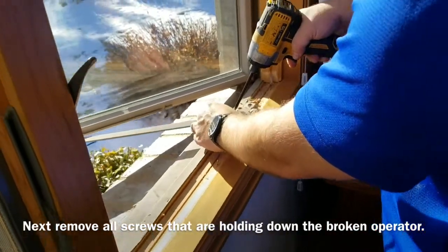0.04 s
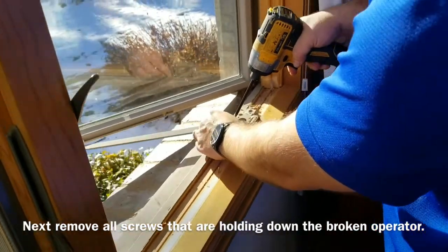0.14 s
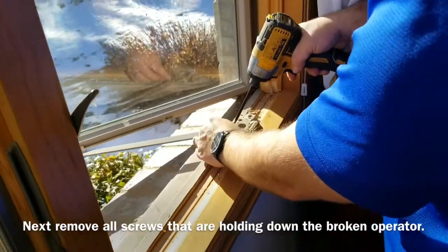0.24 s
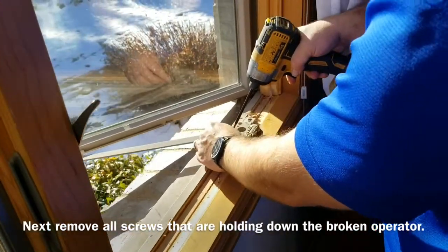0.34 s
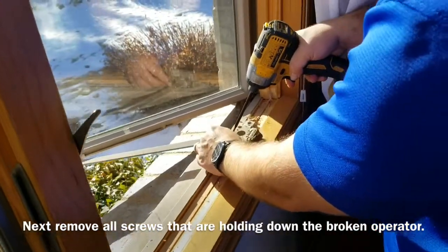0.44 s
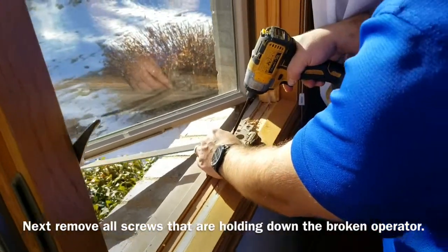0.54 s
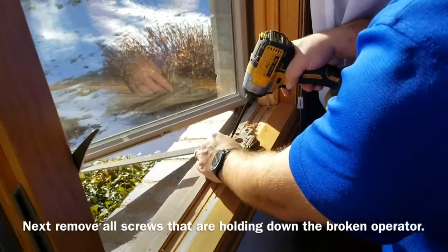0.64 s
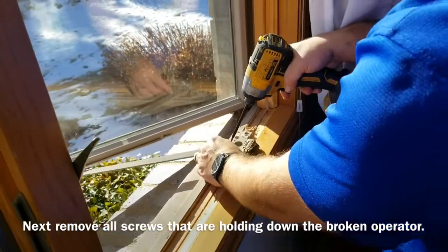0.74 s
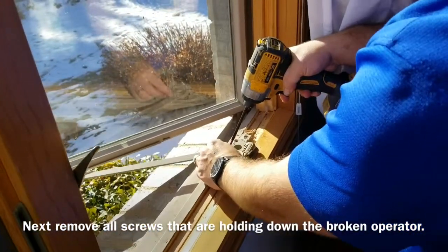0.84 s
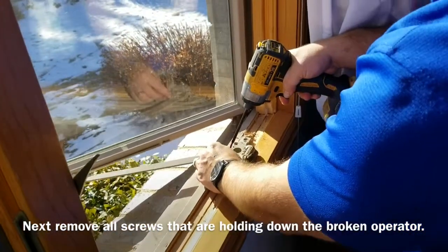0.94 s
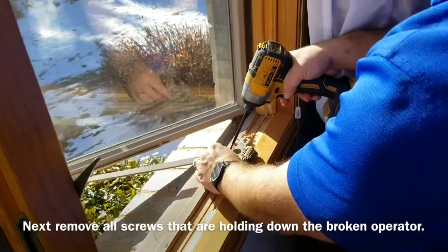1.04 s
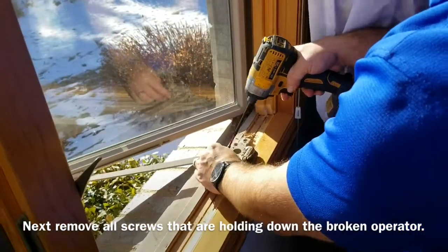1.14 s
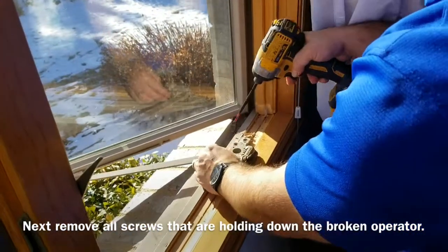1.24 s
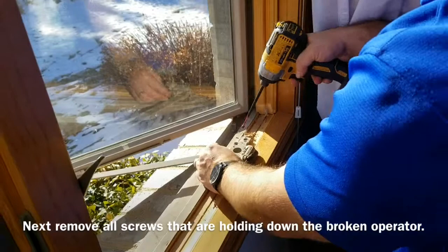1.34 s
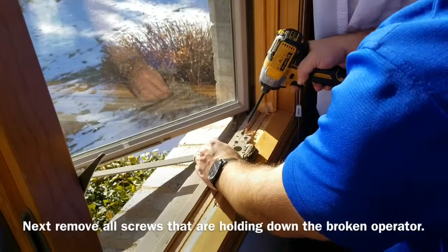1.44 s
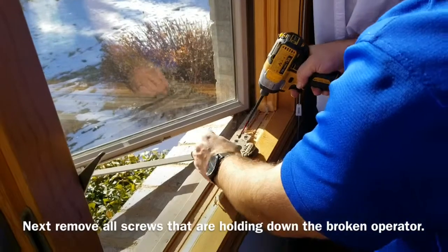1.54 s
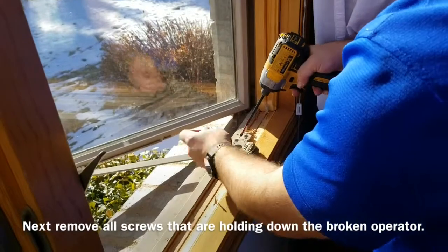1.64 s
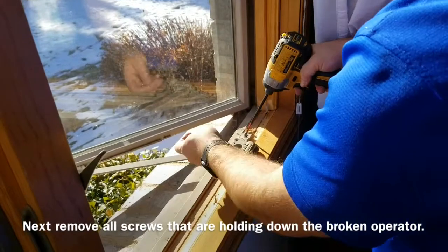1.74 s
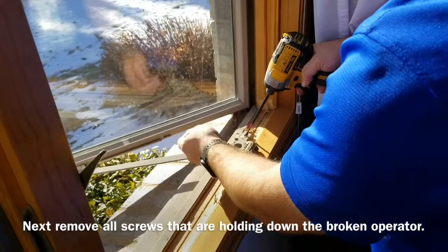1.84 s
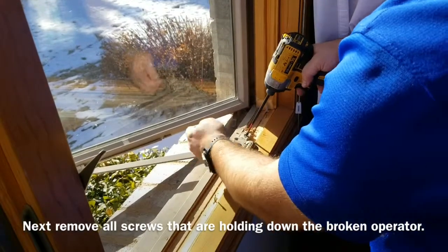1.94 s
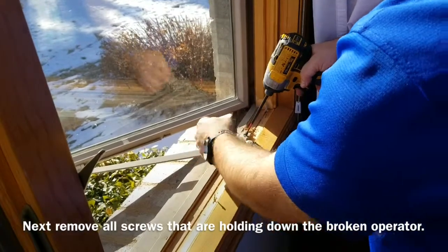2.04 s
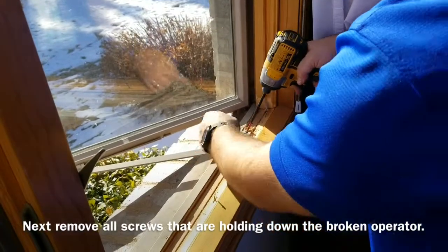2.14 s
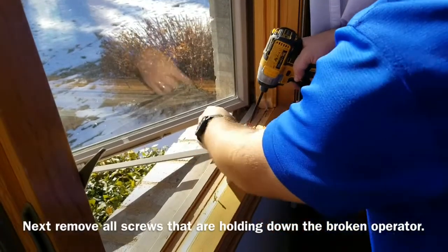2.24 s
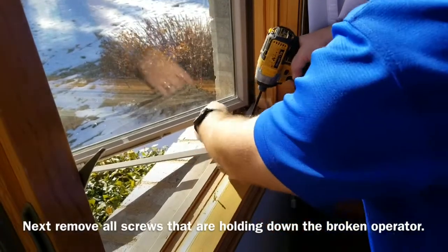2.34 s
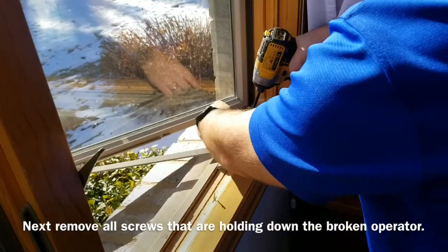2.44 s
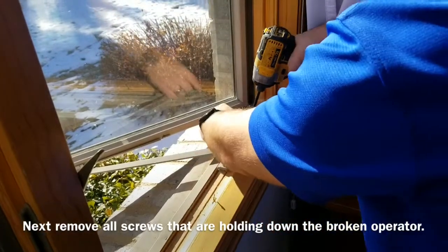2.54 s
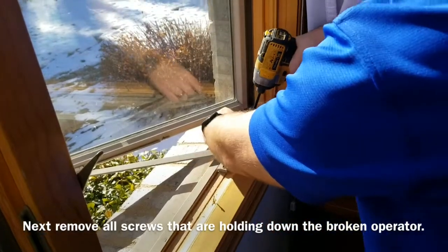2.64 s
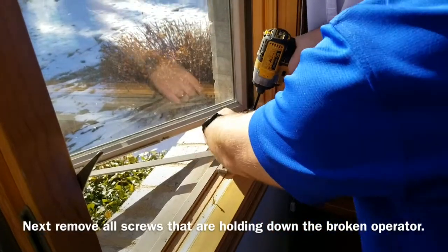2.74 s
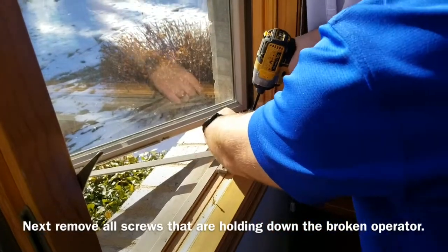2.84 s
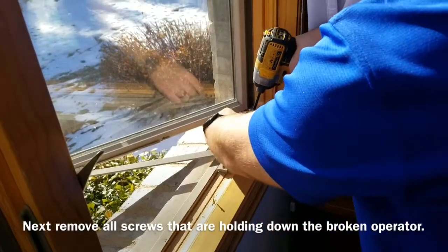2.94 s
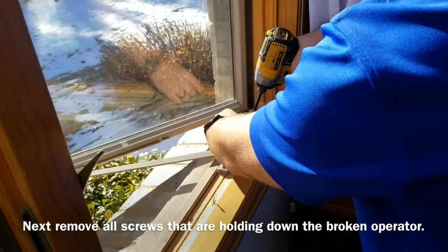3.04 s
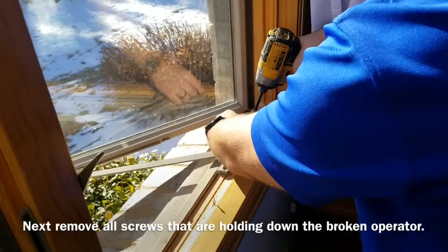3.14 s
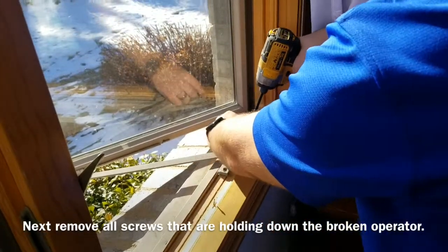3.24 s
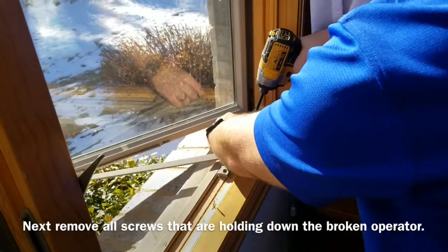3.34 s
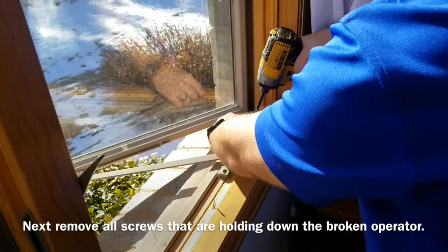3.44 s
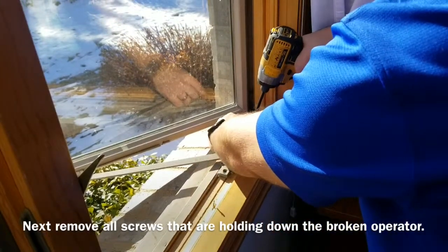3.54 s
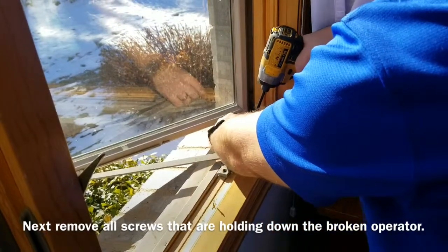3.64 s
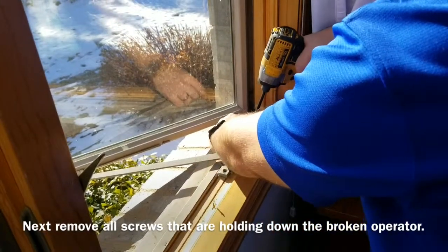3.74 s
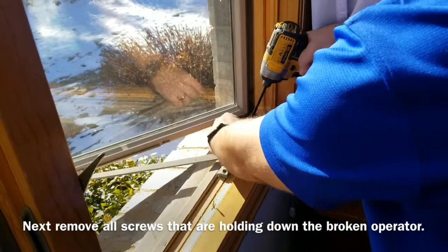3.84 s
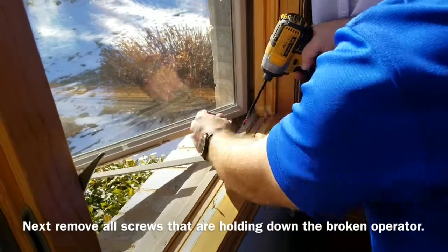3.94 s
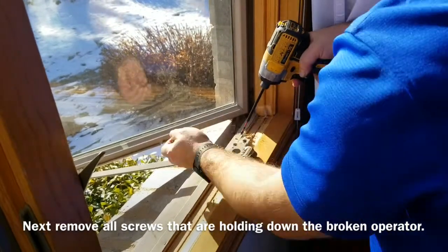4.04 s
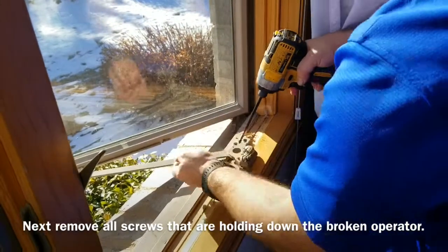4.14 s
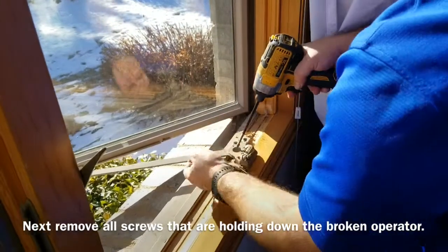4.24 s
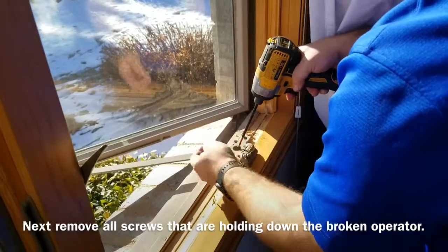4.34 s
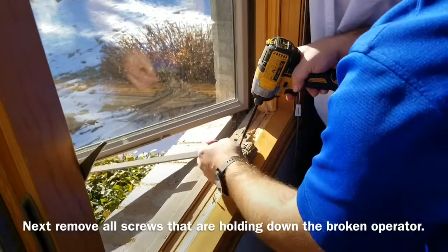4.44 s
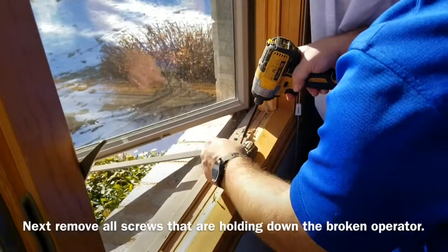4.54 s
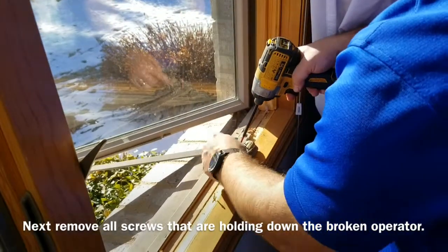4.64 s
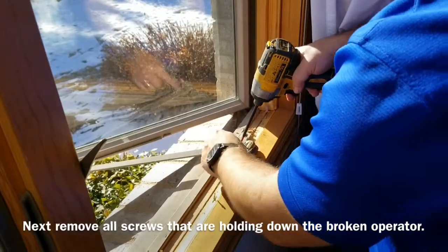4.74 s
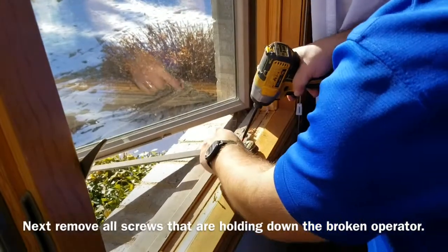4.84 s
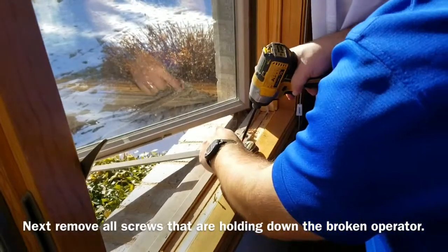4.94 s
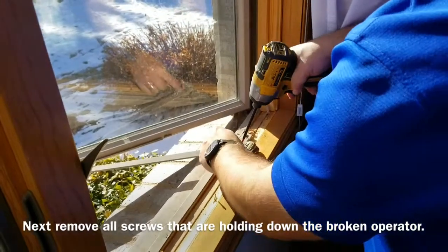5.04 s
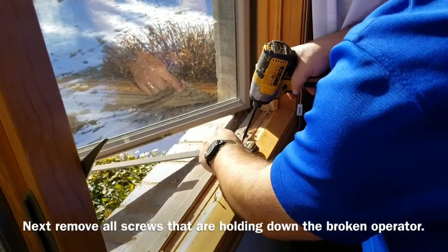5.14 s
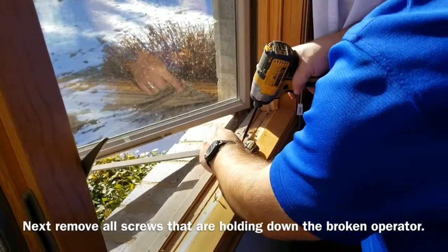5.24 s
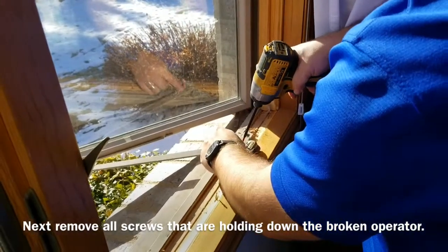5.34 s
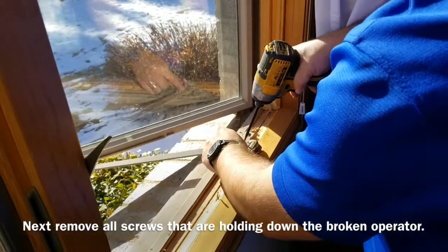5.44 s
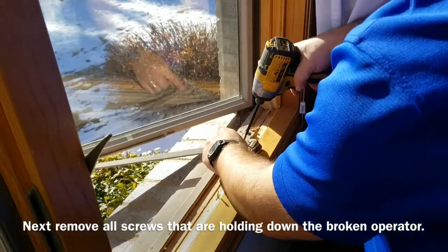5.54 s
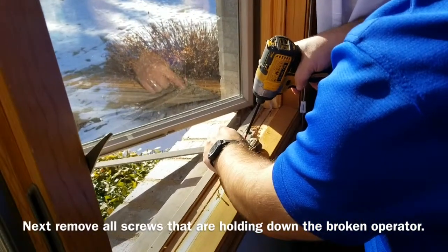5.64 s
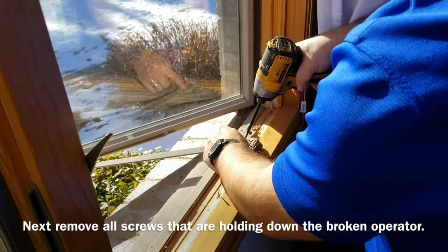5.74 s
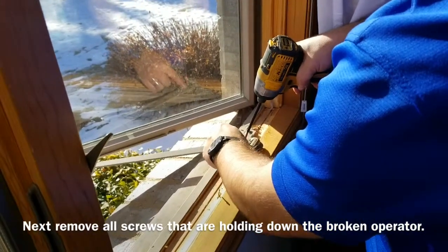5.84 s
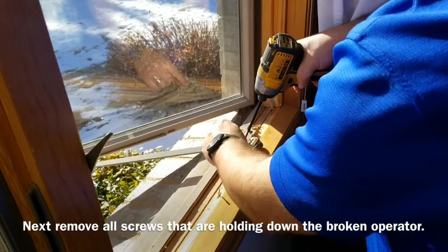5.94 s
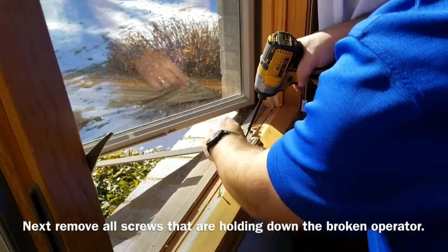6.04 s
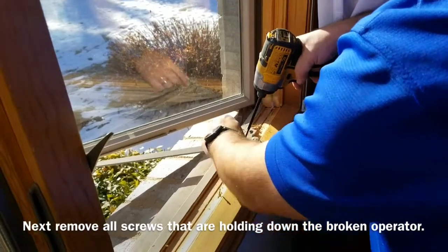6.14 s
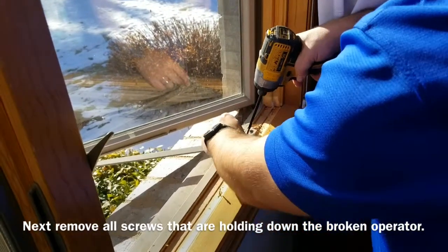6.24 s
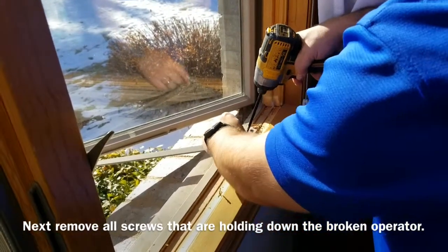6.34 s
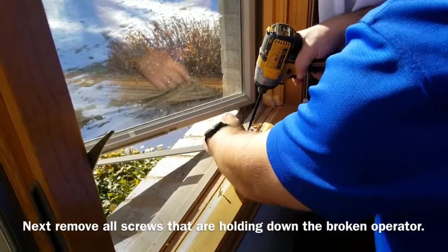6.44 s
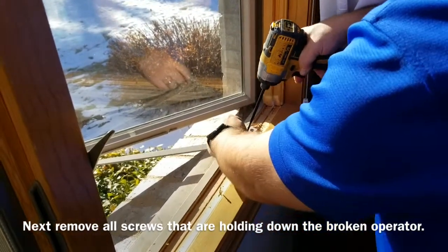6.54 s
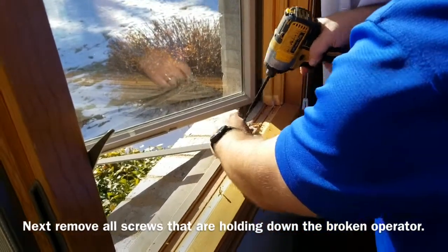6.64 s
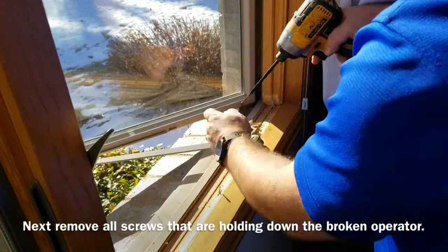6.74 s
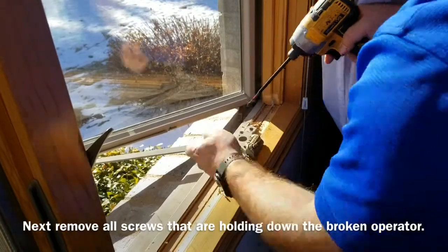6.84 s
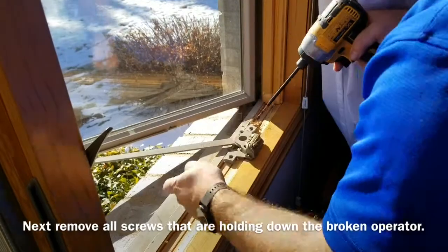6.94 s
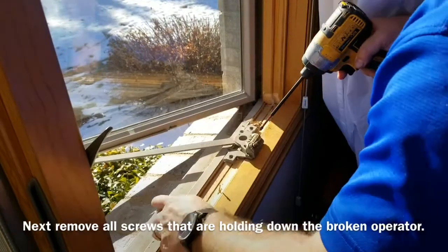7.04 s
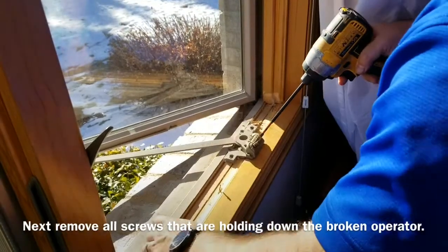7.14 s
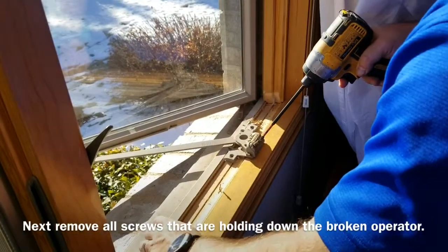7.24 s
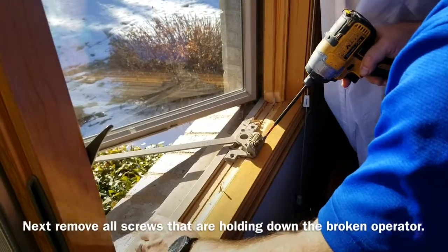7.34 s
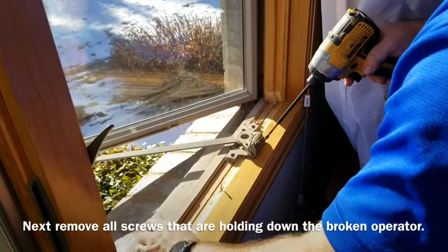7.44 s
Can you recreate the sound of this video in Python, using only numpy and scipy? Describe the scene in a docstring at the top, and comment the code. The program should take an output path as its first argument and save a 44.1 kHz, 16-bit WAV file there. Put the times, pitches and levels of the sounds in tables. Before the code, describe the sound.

A handheld electric driver removes screws from a metal fitting on a wooden sill. Three rough, whining bursts pulse with the turning bit and speed up as screws loosen, each stopping abruptly. Between them come handling ticks, brief squeals, a hard clack, woody thuds and a thin screw ping. The pickup is near, slightly left-leaning, with a short indoor tail, low rumble and faint hiss.

```python
"""In a small room, a cordless driver backs three screws out of a metal fitting on a wooden window sill.
The whine is a stack of motor harmonics; the rasp is noise that partly repeats with every motor turn.
The rasp dips with each turn of the bit, and the motor speeds up as a screw comes free.
Around and between the runs, noise bursts and ringing tones make clicks, scrapes, squeals, knocks on
the sill and loose screws put down. Filtered noise makes the low room sound; a soft hum joins late."""
import sys
import numpy as np
from scipy import signal
from scipy.fft import rfft, irfft
from scipy.io import wavfile

SR = 44100
rng = np.random.default_rng(int(sys.argv[2]) if len(sys.argv) > 2 else 0)


def wav_out(sig):
    """Save sig, one row per channel (or a flat mono array), as 16-bit PCM at SR to the path in sys.argv[1]."""
    wavfile.write(sys.argv[1], SR, np.round(np.clip(np.atleast_2d(sig).T, -1, 1) * 32767).astype(np.int16))


N = 329868
TIME = np.arange(N) / SR   # seconds

# Average motor speed in each run, before small wobbles: (time [s], speed [turns per s])
SPEED_RUN_1 = [(0, 262), (.17, 275), (.41, 305), (.44, 293), (.52, 311), (.6, 341), (.7, 338), (.87, 343),
               (1.05, 361)]
SPEED_RUN_2 = [(2.44, 200.3), (2.57, 302.7), (2.659, 318.2), (2.71, 318), (2.83, 337), (2.92, 343),
               (3.08, 367.6), (3.1, 420.8), (3.14, 439), (3.2, 514), (3.3, 538), (3.61, 557.6), (3.71, 538),
               (3.85, 301)]
SPEED_RUN_3 = [(5.0, 70.15), (5.21, 168.5), (5.28, 190.8), (5.41, 199), (5.455, 287.4), (5.54, 307),
               (5.57, 336), (5.62, 355.6), (5.72, 371), (5.79, 366.7), (5.86, 384.7), (6.04, 393.6),
               (6.12, 456), (6.3, 496), (6.34, 440.8), (6.502, 348)]
# One row per screw: (trigger pulled [s], full power [s], screw comes loose [s], trigger let go [s],
# a moment when the bit slips [s], level at the pull [dB], gear level [dB], housing level [dB],
# change of the gears once loose [dB])
SCREW_RUNS = [(0, 0.007, .6, 1.052, 0.3, 3, -27.5, -37.5, -1.5),
              (2.454, 2.527, 3.25, 3.71, 3.1, -18, -26.5, -36, -2),
              (5.004, 5.53, 5.95, 6.435, 5.835, -23.5, -26, -36.5, -2.5)]
# Whine of each run, lifted by a resonance that shifts as the bit bears on the screw:
# (time [s], level [dB], resonance [Hz], lift [dB])
WHINE_RUN_1 = [(.08, -52, 1060, 7.5), (.22, -51.5, 2170, 8), (.5, -52.5, 2100, 1.5), (.95, -55, 2500, -1),
               (1.04, -59.5, 2630, 19)]
WHINE_RUN_2 = [(2.45, -57.5, 1740, 0.5), (2.56, -49.5, 1720, 3.5), (2.68, -46, 1260, 6.5),
               (2.84, -45, 1690, 8), (3.13, -47, 1730, 9), (3.299, -54, 2182, 7)]
WHINE_RUN_3 = [(5.22, -58.5, 390, 2.1), (5.3, -47, 390, 9), (5.41, -55.5, 400.1, 5.37),
               (5.48, -50, 1450, 3.1), (5.8, -45.5, 1552, 6.4), (6.1, -56.5, 2350, 4.2)]
# How strongly the tool's body passes motor harmonics: (frequency [Hz], level [dB])
BODY_COLOUR = [(150, -14.5), (340, -3.5), (500, -11), (700, -1.5), (1100, -1.5), (1400, -3.5), (2200, 1),
               (3200, -8), (5000, -9.5)]
# Shape of the gear rasp: (frequency [Hz], relative level [dB per Hz])
GEAR_SPECTRUM = [(30, -49), (150, -24.5), (1500, -23), (2800, -2), (3600, -2), (5000, -0.5), (6300, -1),
                 (7600, -2), (8800, -11.5), (10500, -10.5), (13500, -21), (15800, -19.5)]
# Shape of the housing rattle: (frequency [Hz], relative level [dB per Hz])
HOUSING_SPECTRUM = [(30, -60), (100, -19.5), (300, -7.5), (480, -19), (620, -6.5), (850, -12.5),
                    (1100, -3.5), (1600, -1.5), (2200, 4), (2900, 0), (4000, -19), (7000, -36)]
# Lines from meshing gear teeth: (multiple of motor speed [-], relative level [dB])
MESH_LINES = [(9, -2), (13, -3), (14, -2), (15, 0)]
# Ringing steel parts of the gear train: (frequency [Hz], level [dB], 60 dB fade [s])
STEEL_MODES = [(4750, -4.5, 0.0066), (5320, -1, 0.0059), (6460, -2, 0.006), (7200, -3, .005)]
# Resonances of the tool and the fitting it presses on: (frequency [Hz], level [dB], 60 dB fade [s])
TOOL_RESONANCES = [(1086, -19.5, 0.22), (2274, -5, 0.022), (2853, -9, 0.012), (6650, -11, .008),
                   (7500, -22.5, .035)]
# Balance of the driver between channels: (frequency [Hz], left minus right [dB])
DRIVER_BALANCE = [(200, 3.5), (600, 3), (1100, 9.5), (2200, 1), (4500, 4.5), (8000, 10), (14000, 3)]
# Shape of the low house rumble and faint hiss: (frequency [Hz], relative level [dB per Hz])
BACKGROUND_SPECTRUM = [(20, -22), (45, -23), (70, -12.5), (115, -1.5), (160, -8.5), (300, -17),
                       (520, -24.5), (850, -38.5), (1400, -44.5), (4000, -46.5), (6800, -41), (9500, -50),
                       (16000, -48)]
# Hum of the house: (frequency [Hz], rms level before panning [dB])
HUM_TONES = [(70.7, -82), (141.4, -71), (212, -72.5), (283, -64.5)]
# Bit, screws and hand meet the fitting; all levels are shifted again in taps():
# (time [s], clack level [dB], tick level [dB], clack pitch [Hz], left minus right [dB])
CONTACTS = [(0.45, -18, -18.5, 2330, 0), (1.087, -29, -33, 2195, 0), (1.706, -35.5, -52.5, 1170, 6),
            (1.755, -35.5, -47.5, 2150, 3), (1.882, -40.5, -38.5, 2590, 10), (1.894, -38.5, -47, 2600, 4),
            (1.958, -47.5, -63, 1090, 5), (2.042, -30, -45, 580, 3), (2.049, -35.5, -41.5, 1094, 2.5),
            (2.384, -37.5, -31, 1820, 7.5), (3.752, -30.5, -33.5, 2000, 3), (4.475, -35, -57.5, 2124, 6),
            (4.618, -26.5, -31.5, 605, 8), (4.6507, -9, -15.5, 2300, 4), (4.678, -34, -42, 2210, -1),
            (4.816, -31, -46.5, 955, 5), (4.853, -46.5, -51, 1100, 3), (5.031, -34, -32, 2310, 12.5),
            (5.051, -36, -33.5, 2370, 5), (5.19, -29, -32, 1129, 5), (6.576, -47.5, -41, 2080, 2),
            (7.298, -38, -46, 1145, 2), (7.347, -25, -32, 1125, 4), (7.414, -28.5, -36, 1120, 3),
            (7.429, -29.5, -28, 1110, 2), (7.464, -23, -35.5, 1105, 3)]
# Shape of the clack: (frequency [Hz], relative level [dB per Hz])
CLACK_SPECTRUM = [(100, -38.5), (300, -21), (600, 7), (1100, 4.5), (2200, 6), (3000, 1.5), (5000, -51)]
# Shape of the bright tick: (frequency [Hz], relative level [dB per Hz])
TICK_SPECTRUM = [(1500, -21), (3000, -6.5), (4500, -4.5), (6500, -8), (9000, -27.5), (15000, -34)]
# Blows that reach the sill; a lower cut-off is softer: (time [s], level [dB], cut-off [Hz])
SILL_KNOCKS = [(.45, -24.5, 650), (1.958, -46.5, 900), (2.043, -35.5, 1300), (4.618, -34.5, 1200),
               (4.653, -34.5, 1500), (4.68, -34.5, 900), (4.816, -30, 800), (5.044, -38.5, 800)]
# Ringing modes of the sill: (frequency [Hz], relative level [dB], 60 dB fade [s])
SILL_MODES = [(92, -11.5, .2), (120, -10.5, 0.15), (166, -16, 0.1), (221, -2.5, 0.12), (256, -2.5, 0.15),
              (330, -3, 0.11), (381.7, -3, 0.35), (602, -7, 0.17)]
# Shape of the dull thud under those modes: (frequency [Hz], relative level [dB per Hz])
THUD_SPECTRUM = [(40, -46.5), (85, 0), (140, 5.5), (240, 5.5), (380, -0.5), (520, -13.5), (800, -9),
                 (1500, -31)]
# Scrapes, squeals and ringing of bit, screw and fitting; levels are shifted again in scrapes():
# (time [s], length [s], level [dB], pitch [Hz], 60 dB fade of the ring [s])
SCRAPES = [(0.97, 0.12, -48, 2830, 0.069), (1.403, 0.038, -59, 2920, 0.007), (1.4, 0.03, -60, 2130, 0.043),
           (1.881, 0.021, -46.5, 4730, 0.0013), (2.372, 0.045, -53, 1829, 0.0031),
           (3.138, .06, -31.5, 4800, 0.0012), (3.603, 0.073, -52.5, 378, 0.013),
           (3.687, 0.045, -38.5, 2117, 0.0044), (3.773, 0.064, -49, 3550, 0.0015),
           (5.001, 0.049, -44, 6800, .0012), (5.85, 0.52, -46.5, 2334, 0.031),
           (6.349, 0.13, -43.5, 2308, 0.045), (6.36, .13, -56, 1096, 0.081), (7.167, .13, -76.5, 1090, .02)]
# A faint high hiss swells and fades: (time [s], length [s], level [dB])
HISS_SWELLS = [(1.302, 0.56, -72.5), (3.921, 0.41, -65), (4.221, 0.67, -71.5)]
# Shape of that hiss: (frequency [Hz], relative level [dB per Hz])
SWELL_SPECTRUM = [(1500, -28), (2100, -3), (2600, -12), (4200, -15.5), (5100, -4.5), (5700, -18),
                  (6700, 0.5), (7600, -5.5), (9000, -23)]
# Loose screws ping: (time [s], level [dB])
SCREW_PINGS = [(4.02, -51.5), (4.128, -32), (4.152, -46), (7.353, -52), (7.415, -52), (7.455, -51)]

GEAR_RATIO = 53.5   # motor turns per turn of the bit
FREE_SPEED = 459   # turns per s; above this the screw no longer grips
LOOSEN_S = 0.077   # time a screw takes to come loose
LOOSE_HOUSING_DB = -3   # change once the screw is loose
HOUSING_BUILD = 0.63   # share of the build-up that the housing follows
GEAR_STOP_DB_PER_S, HOUSING_STOP_DB_PER_S = 356, 252   # run-down after the trigger is let go
# Once per turn the bit eases in the screw head and the rasp dips; a higher sharpness is briefer.
SLIP_DB, SLIP_SHARPNESS = 6.5, 1.3
HALF_SLIP_DB = 2   # a lesser dip half a turn after each slip
LOOSE_SLIP, HOUSING_SLIP = 0.52, 0.5   # share of the dips left at free speed; share reaching the housing
# The bit jumps out of the screw head just before it strikes the fitting.
SKIP_S, SKIP_WIDTH_S, SKIP_DB = 0.436, 0.0099, 5
BACKGROUND_DB = -57
PING_HZ, PING_T60_S = 13960, 0.17
ROOM_T60_S = 0.22   # time for the room's tail to fade by 60 dB
CUTOFF_HZ = 15950


def from_db(db):
    """Turn decibels into gain."""
    return np.exp(np.asarray(db) * (np.log(10) / 20))


def rms_one(x):
    """Scale a sound to an average (rms) strength of 1."""
    return x / np.sqrt(np.mean(x ** 2) + 1e-20)


def in_time(rows):
    """Draw straight lines between a table's rows, giving each column at every sample."""
    s, *columns = np.transpose(rows)
    return [np.interp(TIME, s, c) for c in columns]


def drift(rate):
    """Make a smooth random curve of spread 1 that changes about rate times a second."""
    step = 40   # samples between the points of the slow curve
    r = np.exp(-2 * np.pi * rate * step / SR)
    noise = rng.standard_normal(N // step + 2002)
    slow = signal.lfilter([1], [1, -2 * r, r * r], noise)[2000:]   # skip the filter's start
    return np.interp(np.arange(N) / step, np.arange(len(slow)), rms_one(slow))


def cut(x, order, hz, kind="low"):
    """Keep the sound below hz (kind low) or above it (kind high)."""
    return signal.sosfilt(signal.butter(order, hz, kind, fs=SR, output="sos"), x)


def colour(x, spectrum, size=4096):
    """Shape a sound to a spectrum with a filter that responds as promptly as it can (minimum phase)."""
    hz, db = np.transpose(spectrum)
    grid = np.maximum(np.arange(size // 2 + 1) * SR / size, 1)
    cepstrum = irfft(np.log(from_db(np.interp(np.log(grid), np.log(hz), db))))
    # Folding the second half onto the first keeps the filter from sounding early.
    cepstrum[1:size // 2] *= 2
    cepstrum[size // 2 + 1:] = 0
    kernel = irfft(np.exp(rfft(cepstrum)))
    return signal.oaconvolve(x, np.array(kernel, ndmin=x.ndim), axes=-1)[..., :x.shape[-1]]


def ring(clicks, hz, t60):
    """Let each unit click start a fading sine of height 1, like a struck solid part."""
    r, w = from_db(-60 / (t60 * SR)), 2 * np.pi * hz / SR
    return signal.lfilter([0, np.sin(w)], [1, -2 * r * np.cos(w), r * r], clicks + 1e-18)


def stereo_noise(size, split_hz=1100):
    """Make white noise in two channels: shared in the bass, unrelated in the treble."""
    shared = cut(rng.standard_normal(size), 1, split_hz)
    return shared + cut(rng.standard_normal((2, size)), 1, split_hz, "high")


def add(track, s, sound):
    """Mix a sound into a track at time s."""
    start = max(round(s * SR), 0)
    track[..., start:start + sound.shape[-1]] += sound[..., :max(N - start, 0)]


def pan(x, left_db):
    """Lean a stereo sound to the left by making the channels differ in level."""
    return x * from_db([[left_db / 2], [-left_db / 2]])


def room(x, tail_db):
    """Add the room's fading tail, alike in both channels only in the bass and weaker near 7 kHz."""
    t = np.arange(SR // 2) / SR
    bass = cut(rng.standard_normal(len(t)), 2, 500)
    field = bass + cut(rng.standard_normal((2, len(t))), 2, 600, "high")
    tinted = colour(field, [(3000, 1.5), (7000, -4.0), (15000, 0.5)])
    tail = rms_one(tinted * from_db(-60 * t / ROOM_T60_S) * (t > .005))
    echoes = signal.fftconvolve(np.atleast_2d(x), tail / np.sqrt(len(t)), axes=1)[:, :N]
    return x + from_db(tail_db) * echoes


def load(turns, speed):
    """Give gains of gears, housing and whine: runs build up, dip with each bit turn, ease and run down."""
    gains = np.zeros((3, N))
    skip_db = -SKIP_DB * np.exp(-((TIME - SKIP_S) / SKIP_WIDTH_S) ** 2)
    for pull, full, loose_s, let_go, slips, pull_db, gear_db, housing_db, loose_db in SCREW_RUNS:
        run = slice(max(round(pull * SR), 0), round(let_go * SR) + SR // 3)
        t = TIME[run]
        build_db = np.interp(t, [pull, full], [pull_db, 0])
        loose = np.clip((t - loose_s) / LOOSEN_S + .5, 0, 1)
        coasting = np.maximum(t - let_go, 0)
        # The bit's angle is zero at the known slip.
        angle = 2 * np.pi * (turns[run] - np.interp(slips, t, turns[run])) / GEAR_RATIO
        slip, half_slip = np.exp(SLIP_SHARPNESS * (np.cos([angle, angle + np.pi]) - 1))
        dips_db = SLIP_DB * slip + HALF_SLIP_DB * half_slip ** 2
        slip_db = skip_db[run] - np.where(speed[run] > FREE_SPEED, LOOSE_SLIP, 1) * dips_db
        gears = gear_db + build_db + slip_db + loose_db * loose
        gears = gears - GEAR_STOP_DB_PER_S * coasting
        stop_db = -HOUSING_STOP_DB_PER_S * coasting
        housing = housing_db + HOUSING_BUILD * build_db + HOUSING_SLIP * slip_db
        housing = housing + LOOSE_HOUSING_DB * loose + stop_db
        gains[:, run] = from_db([gears, housing, stop_db])
    return gains


def whine(turns, speed, waver_db=4.0, spread=0.12, rough=.3, width=0.098, slow_odd_db=-5.0):
    """Sum motor harmonics, shaped by the body and a shifting resonance; at a crawl odd ones weaken."""
    level_db, peak_hz, lift_db = in_time(list(WHINE_RUN_1) + list(WHINE_RUN_2) + list(WHINE_RUN_3))
    out, offset, log_speed = np.zeros((2, N)), spread * drift(3.2), np.log(speed)
    within_turn, crawl = turns % 1, np.interp(speed, [210, 260], [1, 0])
    hz, db = np.transpose(BODY_COLOUR)
    for k in range(1, 11):
        log_hz = np.log(k) + log_speed
        body_db = np.interp(log_hz, np.log(hz), db)
        peak_db = lift_db / (1 + ((log_hz - np.log(peak_hz)) / width) ** 2)
        odd_db = crawl * (k % 2) * slow_odd_db
        gain = from_db(level_db + body_db + peak_db + waver_db * drift(24) + odd_db)
        angle = 2 * np.pi * (k * within_turn + rng.random()) + rough * drift(60)
        out += gain * np.cos(np.float32([angle, angle + k * offset]))
    return np.sqrt(2) * out


def repeat_each_turn(x, period, share, size=64):
    """Bring back part of the rasp one motor turn later, when the same teeth meet again."""
    out, places = x[0] + 1j * x[1], np.arange(N, dtype=float)   # both channels in one complex signal
    earlier = places - period
    for n in range(size, N, size):
        now, past = slice(n, n + size), slice(max(n - 5 * size, 0), n)
        out[now] += share[now] * np.interp(earlier[now], places[past], out[past])
    return np.array([out.real, out.imag])


def rasp(speed, spectrum, recur, bite, grain_db, flutter_db, loose=0.46):
    """Rub teeth hardest once a motor turn, more distinctly when slow; fast turns repeat less closely."""
    slow_bite = bite * np.clip(350 / speed, .7, 2.2)
    press = np.exp(slow_bite * np.cos(2 * np.pi * np.cumsum(speed) / SR)) * from_db(grain_db * drift(300))
    share = np.clip(recur * np.interp(speed, [400, 520], [1, loose]), 0, .9)
    fresh = press * np.sqrt(1 - share ** 2) * stereo_noise(N)
    rubbing = repeat_each_turn(fresh, SR / speed, share)
    return rms_one(colour(rubbing * from_db(flutter_db * drift(30)), spectrum))


def mesh(turns, blur=2.2, waver_db=2.5):
    """Make meshing teeth sing in blurred high lines that follow the motor speed."""
    out, within_turn = np.zeros((2, N)), turns % 1
    for order, db in MESH_LINES:
        gain = from_db(db + waver_db * drift(25))
        for channel in out:
            channel += gain * np.cos(np.float32(2 * np.pi * order * within_turn + blur * drift(70)))
    return rms_one(out)


def chatter(knocks_per_s=450, size_db=3.5, flutter_db=4.0):
    """Knock teeth at random through their play, ringing steel parts that each flare up separately."""
    out, count = np.zeros((2, N)), round(N / SR * knocks_per_s)
    for hz, db, t60 in STEEL_MODES:
        knocks = np.zeros((2, N))
        strength = from_db(size_db * np.clip(rng.standard_normal(count), -2, 2))
        knocks[:, rng.integers(0, N, count)] = rng.choice([-1, 1], (2, count)) * strength
        out += from_db(db + flutter_db * drift(22)) * rms_one(ring(knocks, hz, t60))
    return out


def tool_ringing(modes_db=-2.5):
    """Shake the tool and fitting with noise so that their resonances ring, each wavering in level."""
    shaking = cut(stereo_noise(N), 2, 500, "high")
    out = np.zeros((2, N))
    for hz, db, t60 in TOOL_RESONANCES:
        out += from_db(db + modes_db + 2.2 * drift(4.4)) * rms_one(ring(shaking, hz, t60))
    return out


def driver(mesh_db=-11.5, chatter_db=-11.0, rattle_db=0.93, wobble=0.003026, jitter=0.00704):
    """Let the motor's turning drive its whine and the rasp of gears and housing."""
    speed, = in_time(list(SPEED_RUN_1) + list(SPEED_RUN_2) + list(SPEED_RUN_3))
    speed = speed * (1 + wobble * drift(15.16) + jitter * drift(200))
    turns = np.cumsum(speed) / SR
    gear_load, housing_load, motor_load = load(turns, speed)
    tone = whine(turns, speed)
    rattle = rasp(speed, HOUSING_SPECTRUM, recur=0.29, bite=0.38, grain_db=2.0, flutter_db=2.0)
    gears = rasp(speed, GEAR_SPECTRUM, recur=0.63, bite=0.28, grain_db=1.0, flutter_db=1.5)
    gears = gears + from_db(mesh_db) * mesh(turns) + from_db(chatter_db) * chatter()
    housing = rattle * from_db(rattle_db) + tool_ringing()
    tool = gear_load * gears + housing_load * housing + motor_load * tone
    left, right = room(tool, tail_db=-9.0)
    left = colour(left, [(hz, db / 2) for hz, db in DRIVER_BALANCE])
    right = colour(right, [(hz, -db / 2) for hz, db in DRIVER_BALANCE])
    return np.array([left, right])


def background(hum_from_s=6.6):
    """Make low house rumble with a faint hiss that differs by channel; soft hum tones join near the end."""
    shared, apart = rng.standard_normal((2, N))
    apart = colour(apart, [(100, -21.5), (350, -6.5), (1000, -4.0), (3000, 1.0)])
    air = rms_one(colour(shared + apart * [[1], [-1]], BACKGROUND_SPECTRUM)) * from_db(BACKGROUND_DB)
    hum = sum(from_db(db) * np.sqrt(2) * np.sin(2 * np.pi * hz * TIME) for hz, db in HUM_TONES)
    fade_in = np.clip((TIME - hum_from_s) / 0.13, 0, 1)
    return pan(air + hum * fade_in, left_db=4.5)


def taps(clack_db=-6.0, tick_db=4.0, clack_t60=0.032, tick_t60=0.025, ring_t60=0.021, ring_db=-1.5,
         rise_s=0.0013):
    """Make each contact a short burst: a clack with its own pitch and a bright tick of metal."""
    out, t = np.zeros((2, N)), np.arange(4096) / SR
    for s, level_db, bright_db, hz, left_db in CONTACTS:
        body, edge = stereo_noise(4096, split_hz=3800), stereo_noise(4096)
        clack = from_db(level_db + clack_db - 60 * t / clack_t60) * rms_one(colour(body, CLACK_SPECTRUM))
        pitch = from_db(level_db + ring_db - 60 * t / ring_t60) * np.sin(2 * np.pi * hz * t)
        tick = from_db(bright_db + tick_db - 60 * t / tick_t60) * rms_one(colour(edge, TICK_SPECTRUM))
        burst = (clack + pitch + tick) * (1 - np.exp(-t / rise_s))
        add(out, s, pan(cut(burst, 2, 220, "high"), left_db))
    return out


def sill(level_db=-3.5, spread_db=0.5, thud_db=-6.5, thud_t60=0.31):
    """Knock the wooden sill: a dull thud plus ringing modes whose strengths vary from blow to blow."""
    out, t = np.zeros((2, N)), np.arange(SR // 2) / SR
    hz, mode_db, t60 = np.transpose(SILL_MODES)[:, :, None]
    modes = from_db(mode_db + level_db - 60 * t / t60) * np.sin(2 * np.pi * hz * t)
    count = len(SILL_MODES)
    for s, db, soft_hz in SILL_KNOCKS:
        # Neighbouring modes start in opposite directions.
        strengths = (-1) ** np.arange(count) * from_db(spread_db * rng.standard_normal(count))
        thud = rms_one(colour(stereo_noise(len(t)), THUD_SPECTRUM)) * from_db(thud_db - 60 * t / thud_t60)
        add(out, s, from_db(db) * cut(thud + strengths @ modes, 2, soft_hz))
    return pan(out, left_db=4.5)


def scrapes(level_db=2.5):
    """Let noise set one pitch ringing, as in a scrape, a squeal or a ringing fitting."""
    out = np.zeros((2, N))
    for s, length, db, hz, ring_t60 in SCRAPES:
        size = round(length * SR)
        noise = cut(stereo_noise(size), 2, min(hz / 2, 1000), "high")
        ringing = signal.get_window(("tukey", .5), size) * rms_one(ring(noise, hz, ring_t60))
        add(out, s, from_db(db + level_db) * ringing)
    return pan(out, left_db=1.5)


def swells():
    """Let a faint high hiss, made of shaped noise, come and go between the runs."""
    out = np.zeros((2, N))
    for s, length, db in HISS_SWELLS:
        size = round(length * SR)
        hiss = colour(stereo_noise(SR), SWELL_SPECTRUM)[:, :size]
        add(out, s, from_db(db) * signal.get_window("cosine", hiss.shape[1]) * rms_one(hiss))
    return out


def screws(level_db=-15.5, split_hz=110, tick_hz=7900, tick_t60=0.025, tick_ring_t60=0.0033):
    """Land small steel screws with a thin tick and a close pair of very high bending modes."""
    out, t = np.zeros((2, N)), np.arange(SR // 4) / SR
    pair = np.sin(2 * np.pi * PING_HZ * t) + np.sin(2 * np.pi * (PING_HZ - split_hz) * t)
    ping = pair * from_db(level_db - 60 * t / PING_T60_S)
    for s, db in SCREW_PINGS:
        tick = rms_one(ring(stereo_noise(len(t)), tick_hz, tick_ring_t60)) * from_db(-60 * t / tick_t60)
        add(out, s, from_db(db) * (tick + ping))
    return out


def scene():
    """Mix the driver, the handling sounds in the room, the background and the hiss swells."""
    handling = taps() + sill() + scrapes() + screws()
    return driver() + background() + room(handling, tail_db=-6.0) + swells()


def record(dry):
    """Cut the very top of the treble steeply."""
    return signal.sosfilt(signal.ellip(12, .1, 70, CUTOFF_HZ, fs=SR, output="sos"), dry)


dry = scene()
out = record(dry)
wav_out(out)
```